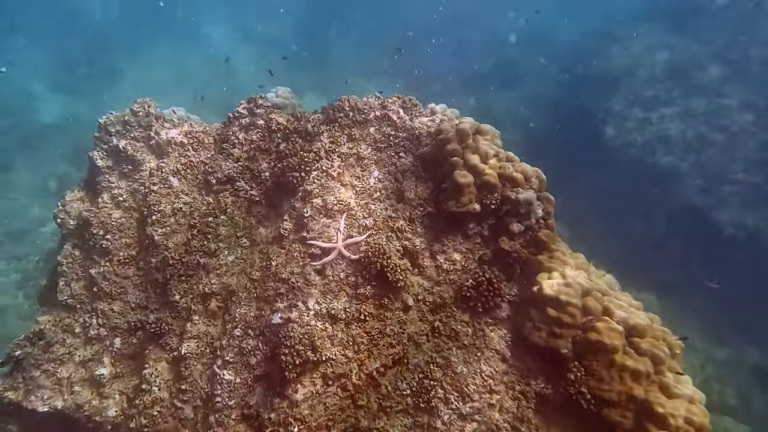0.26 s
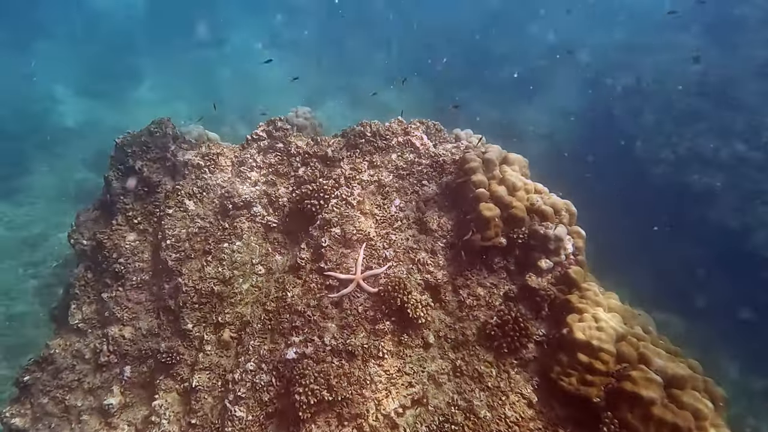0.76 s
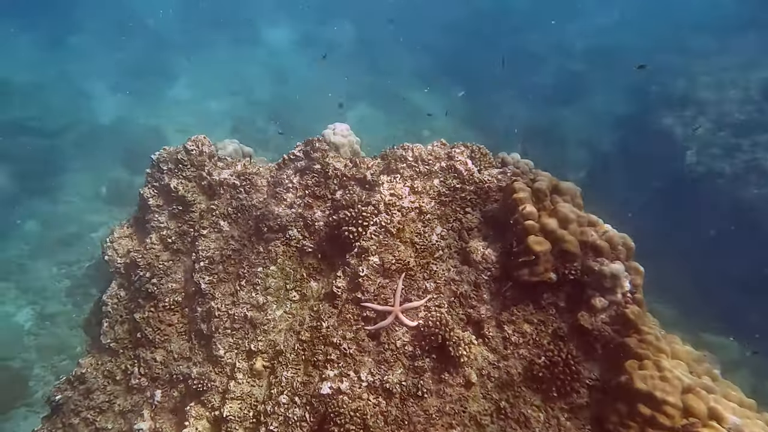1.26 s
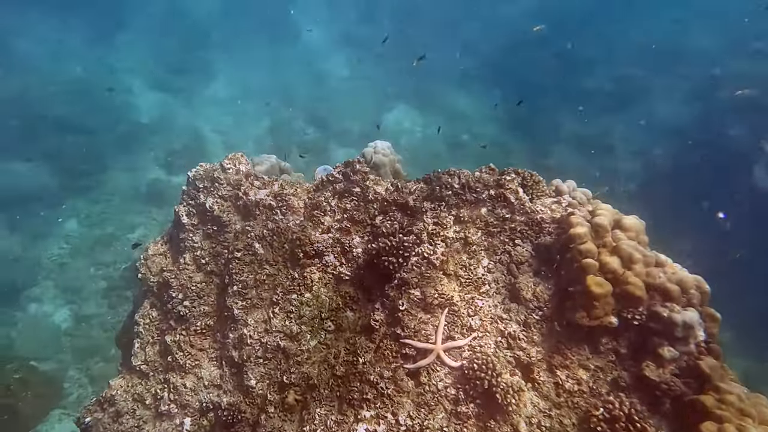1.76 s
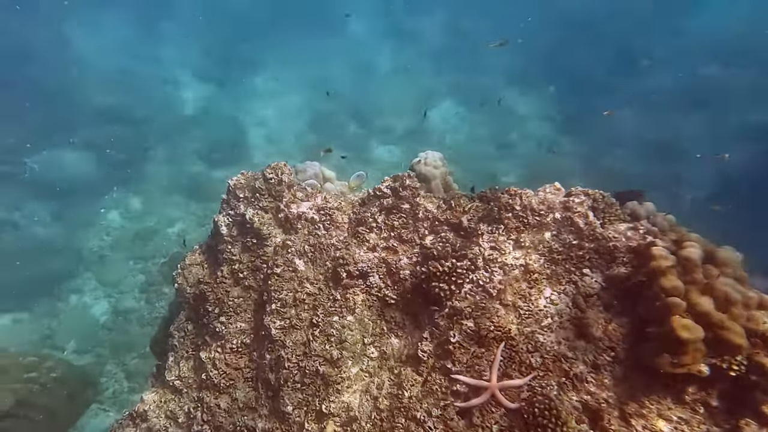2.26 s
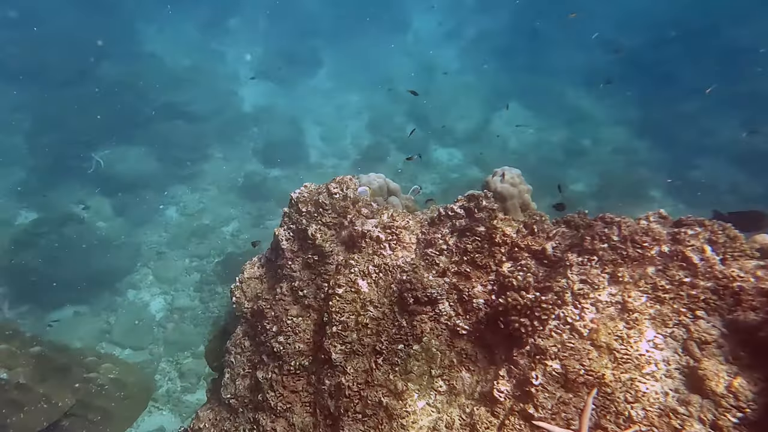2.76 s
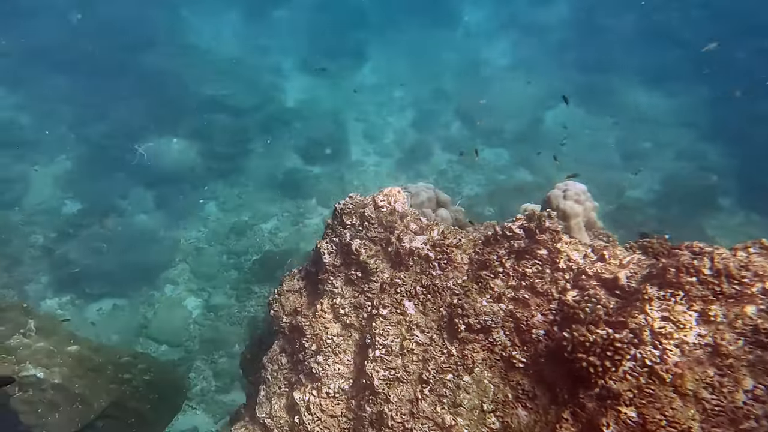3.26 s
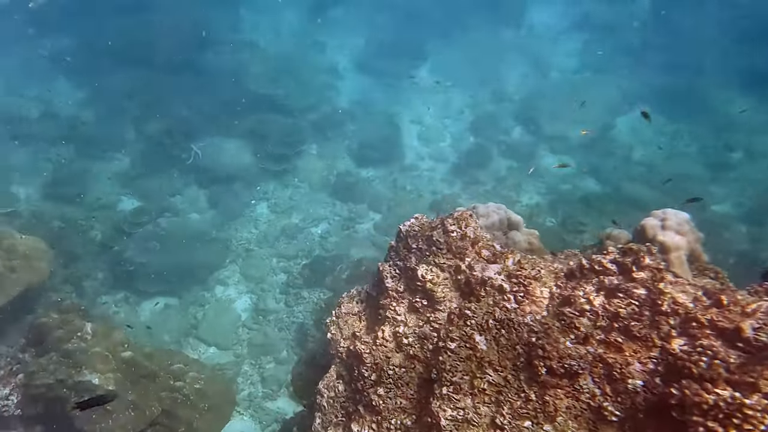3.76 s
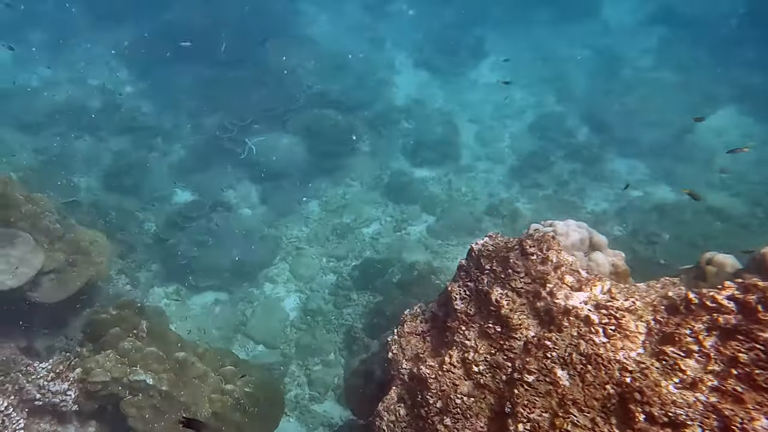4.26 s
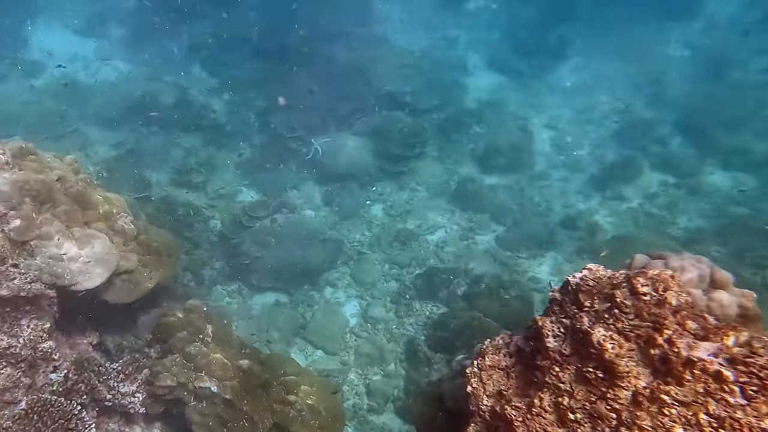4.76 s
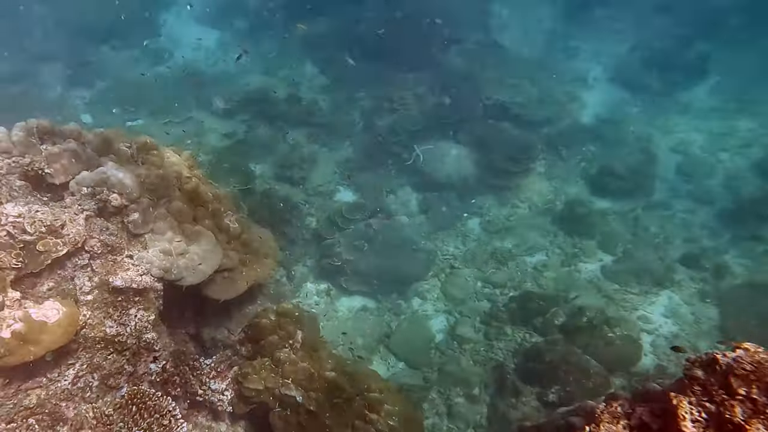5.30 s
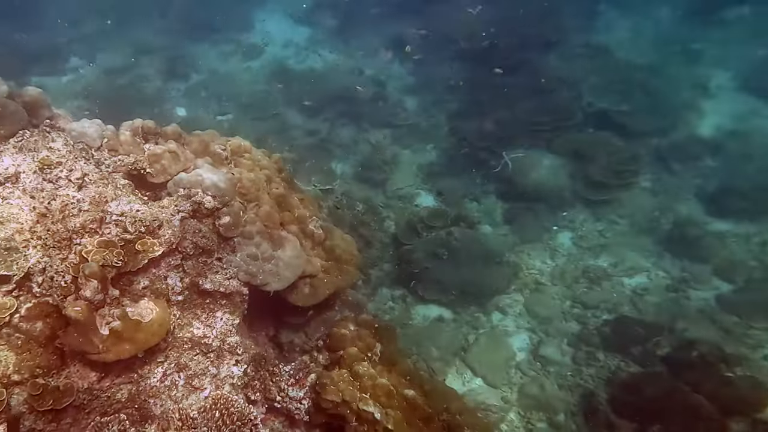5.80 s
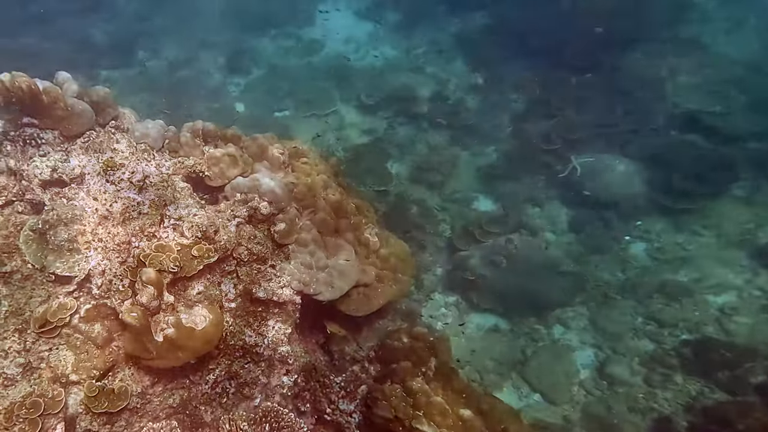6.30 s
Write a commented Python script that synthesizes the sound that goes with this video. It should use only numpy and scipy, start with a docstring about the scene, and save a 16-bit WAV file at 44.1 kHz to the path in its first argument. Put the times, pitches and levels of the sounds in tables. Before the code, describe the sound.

Dry, crisp clicks and fine frying fizz scatter over muffled watery gurgling and low swell rumble, heard from inside a sealed case underwater.

```python
"""Shallow reef inside a sealed camera case

Snapping shrimp crackle near and far as noisy bursts after a sharp spike, over random ticks and fizz.
Bubbles gurgle in the chop overhead as damped, rising tones, and the surge pushes as slow noise.
All but the surge reach the two microphones through the ringing of the case; a faint hiss lies below."""
import sys
import numpy as np
from scipy import signal
from scipy.fft import rfft, irfft, next_fast_len
from scipy.io import wavfile
from scipy.ndimage import uniform_filter1d

SR = 44100
rng = np.random.default_rng(int(sys.argv[2]) if len(sys.argv) > 2 else 0)


def generate_wav(signal):
    """Clip the signal to [-1, 1] and save it as 16-bit WAV at the path in sys.argv[1]."""
    frames = np.transpose(np.atleast_2d(signal))
    scaled = np.clip(frames, -1, 1) * 32767
    pcm = np.round(scaled).astype(np.int16)
    wavfile.write(sys.argv[1], SR, pcm)


def linear_from_db(decibels):
    """Turn decibels (scalar or array-like) into linear amplitude factors; 0 gives 1."""
    return 10 ** (np.asarray(decibels, float) / 20)


N = 288414  # length in samples
SIZE = 4096  # samples in one snap or bubble
BINS = np.fft.rfftfreq(SIZE, 1 / SR)  # Hz
SIDES = np.array([[1], [-1]])  # opposite signs at the left and right microphones


def evened(x):
    """Scales to rms 1 over all channels together."""
    return x / np.sqrt(np.mean(x ** 2) + 1e-20)


def spectrum_at(points, hz):
    """Reads a spectrum in dB on a log-frequency axis."""
    f, value = np.transpose(points)
    return np.interp(np.log(hz + 1), np.log(f + 1), value)


def causal(db):
    """Minimum-phase spectra for rows of gain in dB: folding the cepstrum puts the energy early."""
    cepstrum = irfft(np.log(linear_from_db(np.maximum(db, -100))), SIZE)
    cepstrum[..., 1:SIZE // 2] *= 2
    cepstrum[..., SIZE // 2 + 1:] = 0
    return np.exp(rfft(cepstrum))


def through_case(spectra, turn=0.021):
    """Rings sounds in the resonant modes of the case; the mean of the two microphones peaks at 1."""
    # resonances of the case: (frequency [Hz], width [Hz], signed gain left [ratio], right [ratio])
    case_modes = [(168, 66, 0.31, 0.4), (276, 128, 2.64, 3.24), (292, 103, -2.52, -3.27),
                  (474, 78, 0.27, -0.16), (487, 42, -1.89, -1.2), (604, 127, -0.33, -0.17),
                  (703, 109, -0.66, 1.71), (724, 142, 0.36, -2.23), (1063, 129, -1.72, 1.94),
                  (1068, 96, 2.43, -1.4), (1235, 99, -1.04, -0.62), (1554, 326, 1.26, -1.19),
                  (1595, 315, -0.51, 1.42), (1938, 606, 0.28, 0.08), (2577, 456, 0.49, -1.74),
                  (2763, 606, 1.0, 4.0), (2873, 345, -1.73, -3.49), (3067, 420, -0.06, 0.43),
                  (3990, 878, 0.87, 1.2), (5062, 462, 0.76, 0.95), (5649, 450, 0.9, 1.18),
                  (6109, 1053, 2.1, 2.13), (6758, 2985, -2.51, -2.61), (6930, 1001, 2.19, 2.27),
                  (8304, 250, -0.51, -0.42), (9193, 1025, 0.76, 0.87), (11585, 4828, 0.94, 0.92)]
    # what passes from the water into the case: (frequency [Hz], gain [dB])
    wall_gain = [(60, -3), (110, -38.5), (580, -19.5), (700, -15), (1500, -10.5), (2300, -9), (3900, -9.5),
                 (5800, -8), (7700, -7), (8300, -19), (10300, -23), (12300, -31.5), (13500, -45),
                 (15500, -41), (16600, -100)]
    hz, width, *gains = np.transpose(case_modes)
    f = BINS[:, None]
    modes = 1j * f * width / (hz ** 2 - f ** 2 + 1j * f * width)
    ringing = np.array(gains) @ modes.T
    # each direction of arrival shifts balance and timing between the microphones a little, band by band,
    # most around 1900 Hz, where the two sides of the case swing against each other
    depth = turn + 0.23 * np.exp(-np.log2((BINS + 1) / 1900) ** 2 / 0.84)
    direction = 2 * np.pi * rng.random((len(spectra), 1, 1))
    lean = depth * np.exp(1j * (direction - 4.52 * np.log(BINS + 1))) * SIDES
    wall = causal(spectrum_at(wall_gain, BINS))
    heard = irfft(spectra * (1 + lean) * ringing * wall, SIZE)
    return heard / abs(heard.mean(1)).max(1)[:, None, None]


def placed(rows, sounds):
    """Lays each sound at its time and level, the first two columns of its row."""
    mix = np.zeros((2, N + SIZE))
    for (s, db, *_), sound in zip(rows, sounds):
        start = round(s * SR)
        mix[:, start:start + SIZE] += linear_from_db(db) * sound
    return mix[:, :N]


def scattered(sounds, per_s, spread_db, cap):
    """Plays the sounds at random moments, already under way at the start; most are small, a few large."""
    length = next_fast_len(N + SIZE)
    # levels are exponential in dB, up to cap times spread_db
    size = linear_from_db(spread_db * np.minimum(rng.exponential(1, length), cap))
    hits = size * (rng.random(length) < per_s / SR)
    which = rng.integers(0, len(sounds), length)
    total = sum(rfft(hits * (which == k)) * rfft(sound, length) for k, sound in enumerate(sounds))
    return evened(irfft(total, length)[:, :N])


def wandering(samples):
    """Slow random swings of rms 1: noise smoothed twice over the given span."""
    smooth = uniform_filter1d(rng.standard_normal(N), size=samples)
    return evened(uniform_filter1d(smooth, size=samples))


def snap(centre_hz, octaves=1.0, skirt_db=-16, burst_s=0.0022, tail_db=-16, tail_t60=0.14,
         dense=0.2, apart_hz=16000, lead=1.25):
    """A collapsing cavity: faint forerunner, sharp spike, ragged burst off the burrow walls, reef echoes."""
    forerun_s = 0.00065  # from the first faint push of the claw to the collapse
    t = np.arange(SIZE) / SR - forerun_s
    chance = rng.random((len(centre_hz), 3, SIZE))
    burst = linear_from_db(-9 * t / burst_s) * (t > 0) * (t < burst_s)
    onset = np.where(t > 0, 1 - np.exp(-t / 0.0006), 0.25)  # 0.25 is the forerunner
    echoes = linear_from_db(tail_db - 60 * t / tail_t60) * onset
    spikes = (chance[:, 0] < dense) * (2 * chance[:, 1] - 1) * (burst + echoes)
    spikes[:, round(forerun_s * SR)] = lead  # the collapse itself
    # a difference between the two sides that grows towards the shortest waves
    apart = rfft(spikes * (2 * chance[:, 2] - 1)) * (BINS / apart_hz) ** 2
    away = np.log2((BINS + 1) / np.array(centre_hz)[:, None]) / np.reshape(octaves, (-1, 1))
    hump_db = np.maximum(-6 * away ** 2, skirt_db)
    # every path over the reef has its own ripple of humps and dips, one or two to the octave
    ripple_turns = chance[:, 1, :1] + (1 + chance[:, 2, :1]) * np.log2(BINS + 1)
    ripple_db = 4.5 * np.sin(2 * np.pi * ripple_turns)
    tilt_db = spectrum_at([(550, -27.5), (750, 4), (9000, -2.0), (13000, 6.0)], BINS)
    colour = causal(hump_db + ripple_db + tilt_db)
    return through_case((rfft(spikes)[:, None] + apart[:, None] * SIDES) * colour[:, None])


def shrimp():
    """Near snaps one by one, a middle ground of ticks in many colours, and a far, dense fizz."""
    # near snaps: (time [s], level of the sharp part [dB], centre of its colour [Hz],
    # dull body relative to the sharp part [dB])
    near_snaps = [(0.325, -30, 6500, -19), (0.7989, -31, 3450, -9), (0.8923, -29, 3540, -1.5),
                  (1.8265, -26.5, 7500, -25), (1.8726, -30.5, 2640, -3), (2.1276, -30, 4000, -20),
                  (2.7737, -28.5, 2520, -10), (3.0355, -23.5, 4050, -22), (3.2676, -25, 6500, -21),
                  (3.887, -29, 6500, -4), (4.2058, -28, 3900, -5), (0.186, -24, 6500, -27),
                  (0.3457, -29, 5000, -15), (1.5663, -25, 5270, -20), (2.7516, -26, 7200, -25),
                  (2.8774, -26, 6040, -26), (3.813, -28, 7500, -23), (3.8272, -25, 5660, -22),
                  (4.0147, -29, 5700, -27), (6.0252, -26.5, 3600, -9), (0.059, -22, 6100, -27),
                  (0.222, -22, 3480, -1.5), (0.2547, -16.5, 5460, -20), (0.3333, -19, 4140, -17),
                  (0.5072, -30.5, 7000, -18), (0.5323, -21, 4030, -18), (0.8409, -20.5, 6450, -41),
                  (1.029, -39, 7300, 16.5), (1.299, -24, 6300, -33), (1.3568, -27.5, 5050, 3.5),
                  (1.3843, -23.5, 4450, -7), (1.441, -18.5, 5800, -18), (1.4669, -25.5, 5500, -1),
                  (1.701, -28.5, 6100, 0.5), (1.9966, -10.5, 4130, -10), (2.1541, -32.5, 2730, 16),
                  (2.1598, -28, 6050, -34), (2.1964, -19, 3650, -23), (2.305, -25, 3700, -3),
                  (2.3456, -25, 2980, 3), (2.364, -22.5, 6070, -15), (2.471, -21.5, 5000, -23),
                  (2.4825, -17.5, 5360, -42), (2.4976, -20, 7000, -37), (2.786, -21.5, 5730, -18),
                  (3.287, -12.5, 6450, -34), (3.3938, -23.5, 5200, -3.5), (3.6459, -21.5, 6230, -14),
                  (3.755, -16, 4160, -12), (3.914, -26, 2690, 3), (3.9635, -13, 6800, -33),
                  (4.093, -31, 7260, 5.5), (4.105, -24.5, 5470, -1.5), (4.1682, -24.5, 4730, -8),
                  (4.2913, -27.5, 7440, -38), (4.3975, -27, 5450, 1.5), (4.8483, -25.5, 6650, -2.5),
                  (4.889, -23.5, 3220, -1), (4.9775, -23.5, 6440, -23), (5.22, -18, 7100, -39),
                  (5.373, -30.5, 4970, 7), (5.4853, -24.5, 5030, -33), (5.6184, -28.5, 5270, 3.5),
                  (5.821, -24.5, 3900, -9.5), (5.92, -41.5, 2500, 19.5), (6.0864, -18.5, 3340, -2),
                  (6.2482, -22.5, 8600, -32), (6.298, -31.5, 7000, 7.5), (6.314, -14.5, 3230, -22),
                  (6.3486, -25, 6200, -31), (6.3546, -9.5, 5270, -32)]
    s, _, hz, body_db = np.transpose(near_snaps)
    body = snap(np.full(len(s), 1600.), octaves=0.91, skirt_db=-7.5, tail_db=-8.5, lead=3.4)
    sharp = snap(hz, octaves=0.62, skirt_db=-12.0, burst_s=0.0019, tail_db=-2, tail_t60=0.025,
                 dense=0.14, lead=2.6)
    near = placed(near_snaps, sharp + linear_from_db(body_db)[:, None, None] * body)

    colours_hz = np.linspace(2300, 9000, 36)
    widths = 0.5 + 0.9 * rng.random(len(colours_hz))  # octaves
    ticks = snap(colours_hz, octaves=widths, skirt_db=-11, burst_s=0.0011, tail_db=-17,
                 tail_t60=0.05, lead=1.8)
    ticks = scattered(ticks, per_s=150, spread_db=7, cap=2.1)

    fizz = snap(np.geomspace(1400, 8300, 9), octaves=0.16, skirt_db=-10, tail_db=-13.0, lead=1.0)
    fizz = scattered(fizz, per_s=1500, spread_db=11.0, cap=1.64)
    # the crackle swells in random flurries of about a tenth of a second, the fizz only slightly
    flurry = wandering(2500)
    return near + linear_from_db(-47.5 + 1.7 * flurry) * ticks + linear_from_db(-49.5 + 0.23 * flurry) * fizz


def level_curve(curve, axis):
    """One dB column of a level curve as a gain per sample."""
    columns = np.transpose(curve)
    return linear_from_db(np.interp(np.arange(N) / SR, columns[0], columns[axis]))


def bubble(hz, t60, rise=1.0, start_s=0.0031, wobble=0.39):
    """A damped, unsteady breathing tone whose pitch creeps up as the bubble nears the surface."""
    t = np.arange(SIZE) / SR
    hz = np.array(hz)[:, None]
    t60 = np.maximum(t60, 0.01)[:, None]
    chance = rng.random((len(hz), 3))
    turns = hz * (t + rise * t ** 2) + chance[:, :1]
    # a neighbour of similar size, within about 30 % in pitch, beats against it
    turns_beside = hz * (0.7793 + 0.518 * chance[:, 1:2]) * t + chance[:, 2:]
    fade = np.cos(np.pi / 2 * t / t[-1])
    shape = (1 - np.exp(-t / start_s)) * linear_from_db(-60 * t / t60) * fade
    tone = np.sin(2 * np.pi * turns) + wobble * np.sin(2 * np.pi * turns_beside)
    return through_case(rfft(shape * tone)[:, None], turn=0.018)


def gurgle():
    """The loud bubbles one by one over random crowds of deep, high and tiny ones that follow the chop."""
    # single bubbles: (time [s], peak level [dB], pitch [Hz])
    loud_bubbles = [(0.115, -33.5, 395), (0.168, -26.5, 244), (0.297, -31.5, 159), (0.423, -26.5, 423),
                    (0.682, -31, 567), (1.422, -25.5, 450), (1.431, -31.5, 170), (1.649, -23.5, 563),
                    (1.73, -33, 487), (1.79, -34.5, 453), (1.94, -16.5, 471), (1.951, -37, 1235),
                    (2.168, -23.5, 440), (2.274, -27.5, 211), (2.571, -28, 460), (2.575, -25.5, 235),
                    (2.706, -32.5, 260), (2.835, -32.5, 434), (3.032, -25, 488), (3.192, -30.5, 238),
                    (3.476, -28, 296), (3.576, -32.5, 182), (3.794, -23.5, 430), (3.811, -33.5, 259),
                    (4.07, -25.5, 457), (4.078, -18, 266), (4.092, -23.5, 382), (4.436, -38.5, 1250),
                    (4.646, -25.5, 433), (4.759, -26, 200), (4.908, -26.5, 454), (5.196, -26, 217),
                    (5.3174, -32.5, 970), (5.367, -22, 572), (5.454, -33, 204), (5.606, -22.5, 170.4),
                    (6.15, -33.5, 970), (6.288, -36.5, 1200), (6.52, -29, 473)]
    # gurgling of the chop, before the slosh:
    # (time [s], level of the deep bubbles [dB], level of the higher bubbles [dB])
    chop_levels = [(0.0, -36, -40), (0.16, -38, -39), (0.71, -41, -46.5), (1.29, -52, -44),
                   (1.8, -40, -36.5), (2.28, -45.5, -42), (2.73, -39, -39.5), (3.2, -47, -46.5),
                   (3.6, -43, -40), (4.08, -39, -40.5), (4.43, -49, -44), (4.61, -45, -38),
                   (4.83, -43, -39.5), (5.15, -45, -36), (5.54, -33, -40.5), (5.96, -47.5, -41.5),
                   (6.3, -41.5, -42), (6.54, -50, -40.5)]
    hz = np.transpose(loud_bubbles)[2]
    ring_s = 0.074 * (450 / hz) ** 0.74  # t60: smaller, higher bubbles die sooner
    single = placed(loud_bubbles, bubble(hz, ring_s))

    deep_hz, high_hz = np.linspace(170, 305, 9), np.linspace(350, 550, 9)
    tiny_hz = np.geomspace(780, 1800, 14)
    # decay by 60 dB takes 30 or 42 cycles, but never under 10 ms
    deep = scattered(bubble(deep_hz, 30 / deep_hz), per_s=150, spread_db=3.5, cap=2.4)
    high = scattered(bubble(high_hz, 42 / high_hz), per_s=220, spread_db=3.0, cap=2.5)
    tiny = scattered(bubble(tiny_hz, 30 / tiny_hz), per_s=120, spread_db=2.0, cap=3.5)

    # each slap of the chop stirs all three crowds at once
    slosh = linear_from_db(2.4 * np.minimum(wandering(1800), 1))
    deep_gain, high_gain = level_curve(chop_levels, axis=1), level_curve(chop_levels, axis=2)
    return single + slosh * (deep_gain * deep + high_gain * high + linear_from_db(-17.5) * high_gain * tiny)


def coloured(points, channels):
    """Steady noise of rms 1, shaped by a given spectrum."""
    size = next_fast_len(N)
    gain = linear_from_db(spectrum_at(points, np.fft.rfftfreq(size, 1 / SR)))
    return evened(irfft(rfft(rng.standard_normal((channels, size))) * gain, size)[:, :N])


def surge():
    """Slow pressure swings flex the whole case, nearly alike at both microphones."""
    # colour of the surge: (frequency [Hz], relative density [dB])
    surge_colour = [(5, -3.5), (21, 5.5), (32, 4.5), (51, -8.5), (97, -29.5), (113, -39), (130, -29),
                    (170, -60), (290, -120)]
    # push of the swell on the case: (time [s], level [dB])
    swell_levels = [(0, -32.5), (1.0, -33), (1.9, -32), (2.2, -25), (2.5, -26), (2.75, -34), (3.0, -28),
                    (3.4, -38), (3.85, -28), (4.3, -38), (5.1, -30), (6.54, -31)]
    both = coloured(surge_colour, channels=1)
    balance_db = np.array([[-0.36], [0.36]])  # left, right
    return level_curve(swell_levels, axis=1) * both * linear_from_db(balance_db)


def scene():
    """Shrimp, bubbles and surge."""
    return shrimp() + gurgle() + surge()


def top_cut(x):
    """Nothing passes above the cut-off."""
    return signal.sosfilt(signal.butter(12, 16510, fs=SR, output="sos"), x)


def record(dry):
    """Each microphone adds its own faint, steady hiss."""
    # colour of the microphone hiss: (frequency [Hz], relative density [dB])
    hiss_colour = [(130, 12), (8000, -29), (12500, -1), (13500, -12), (15500, -26), (16200, -60)]
    hiss = linear_from_db(-69.5) * coloured(hiss_colour, channels=2)
    return top_cut(dry + hiss)


dry = scene()
out = record(dry)
generate_wav(out)
```